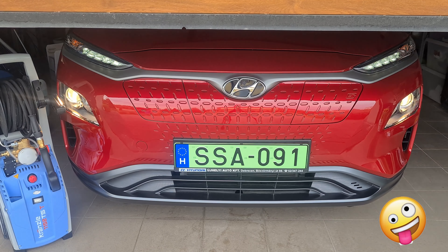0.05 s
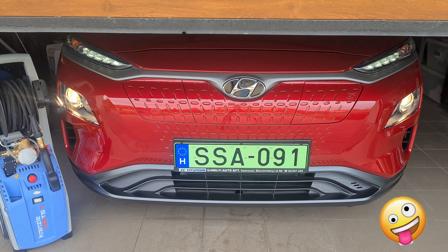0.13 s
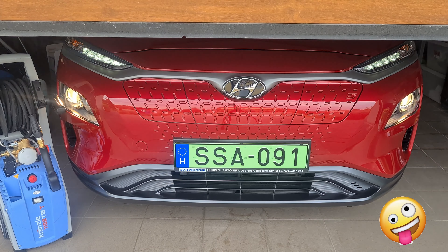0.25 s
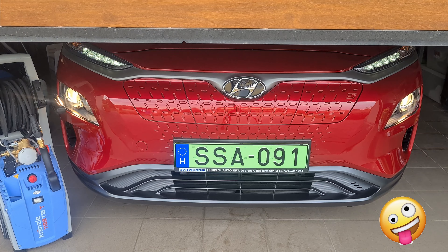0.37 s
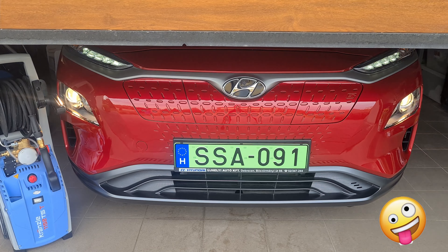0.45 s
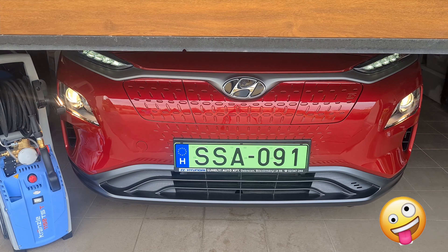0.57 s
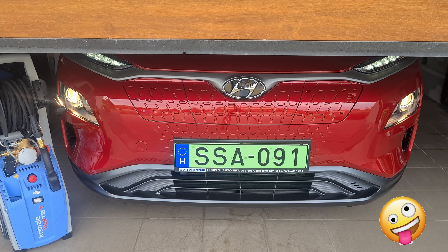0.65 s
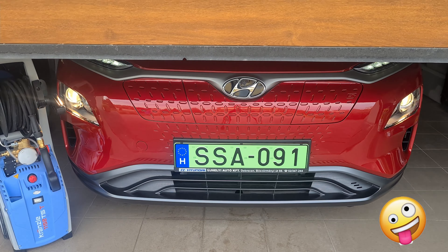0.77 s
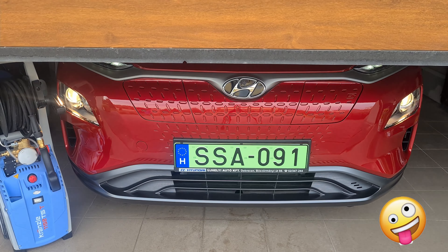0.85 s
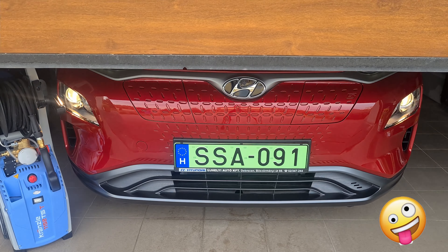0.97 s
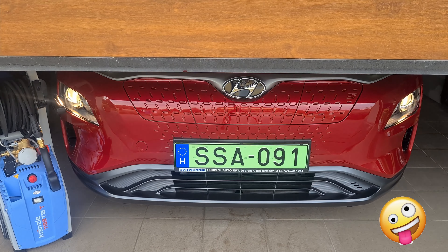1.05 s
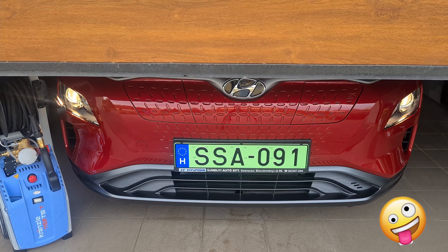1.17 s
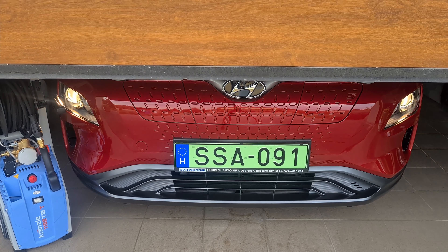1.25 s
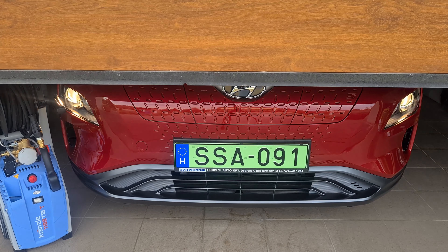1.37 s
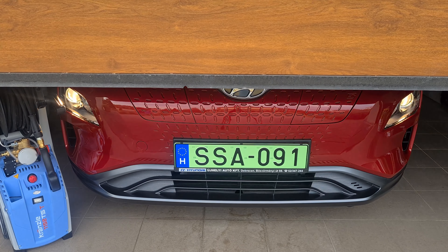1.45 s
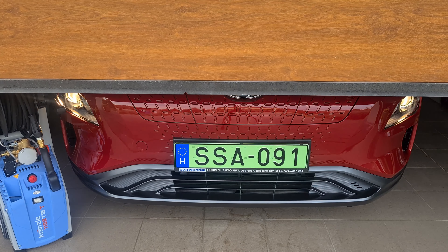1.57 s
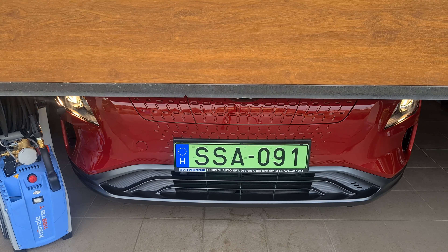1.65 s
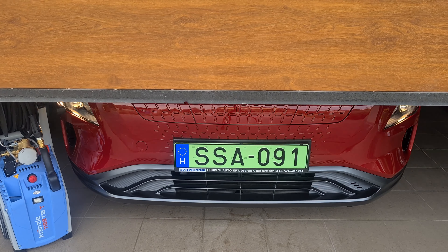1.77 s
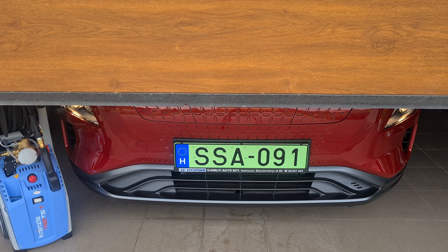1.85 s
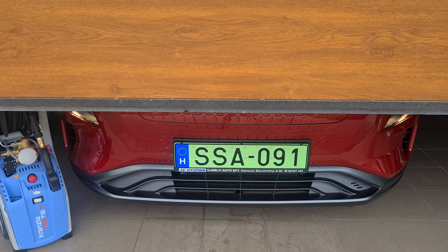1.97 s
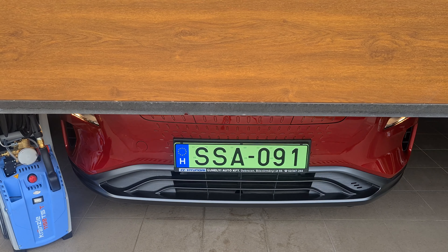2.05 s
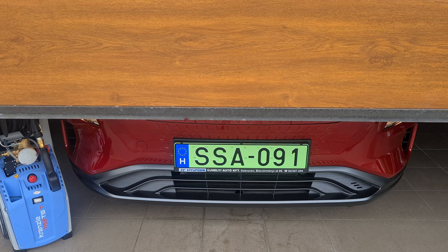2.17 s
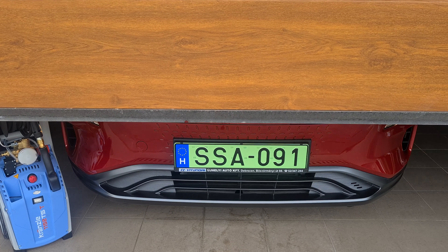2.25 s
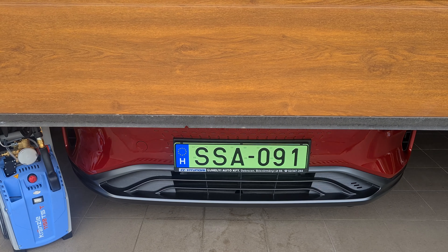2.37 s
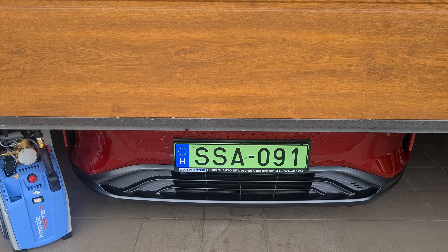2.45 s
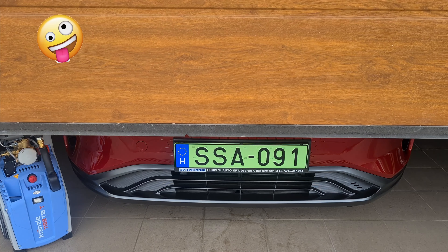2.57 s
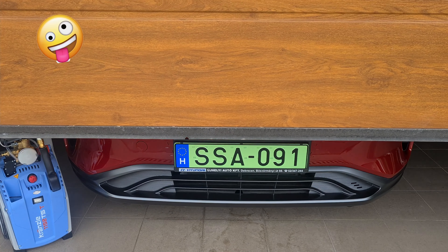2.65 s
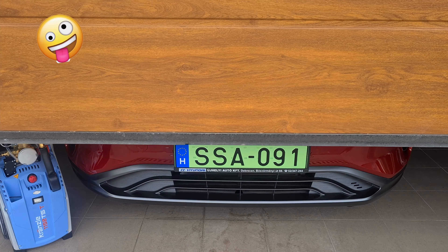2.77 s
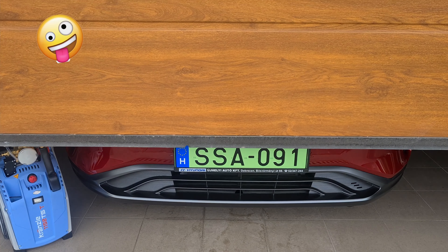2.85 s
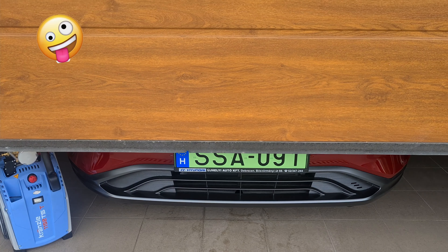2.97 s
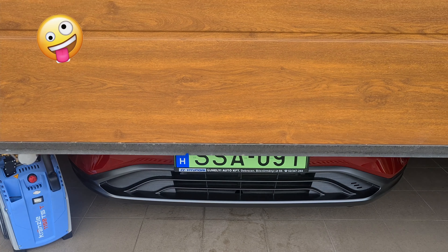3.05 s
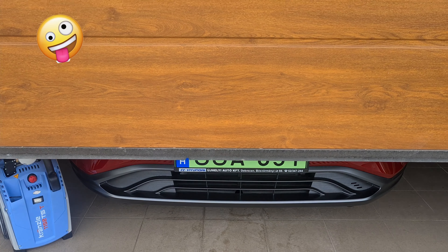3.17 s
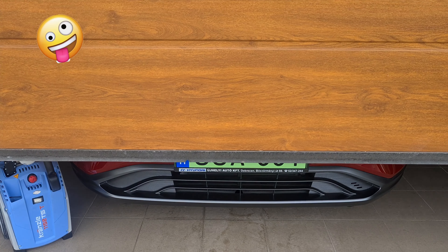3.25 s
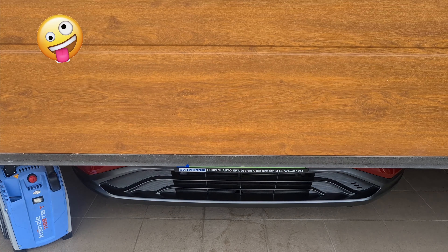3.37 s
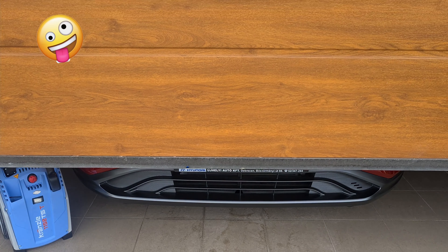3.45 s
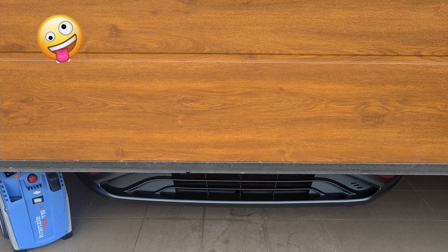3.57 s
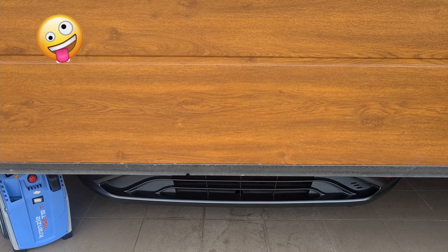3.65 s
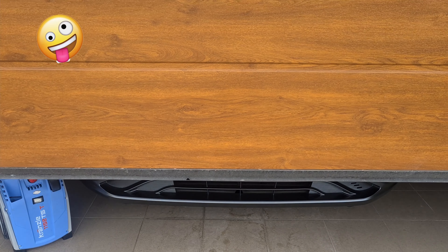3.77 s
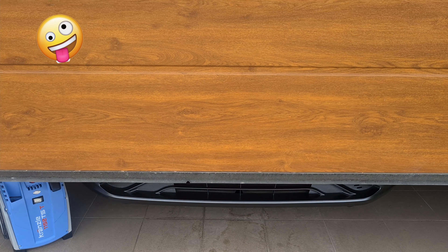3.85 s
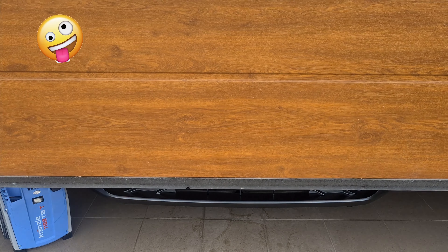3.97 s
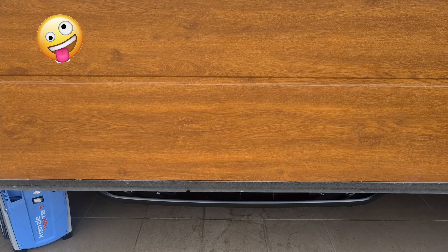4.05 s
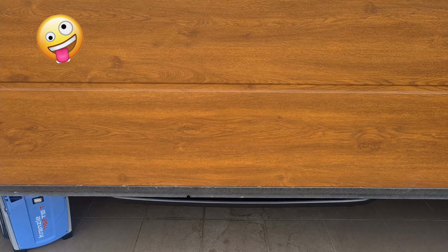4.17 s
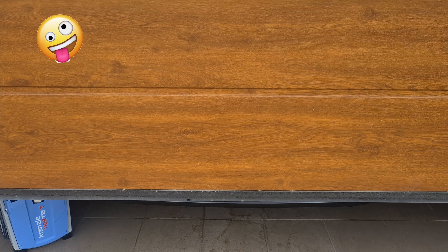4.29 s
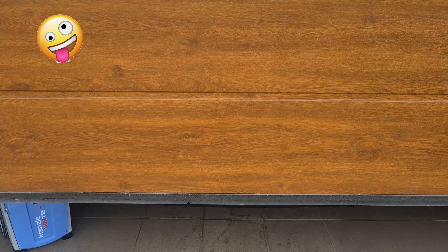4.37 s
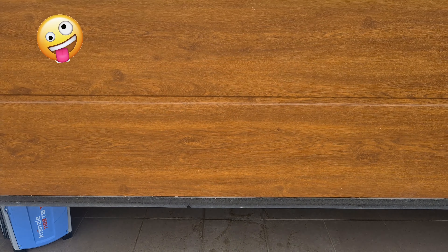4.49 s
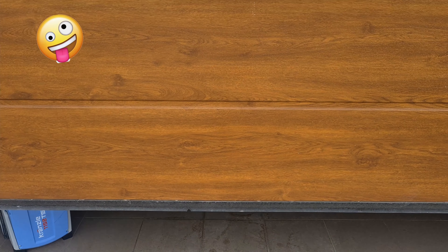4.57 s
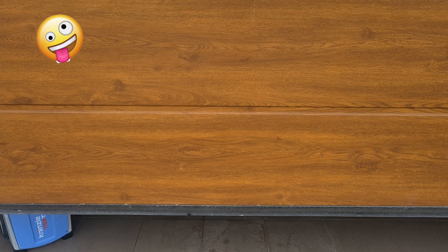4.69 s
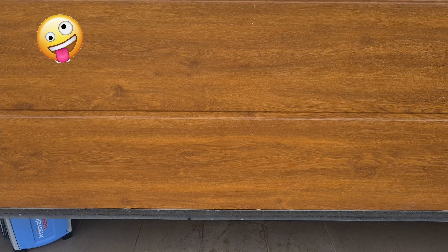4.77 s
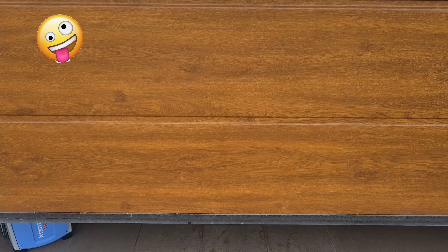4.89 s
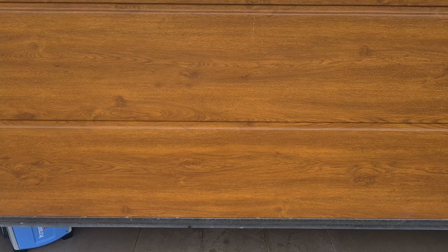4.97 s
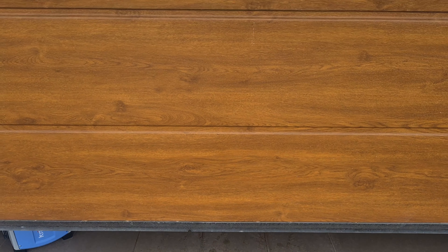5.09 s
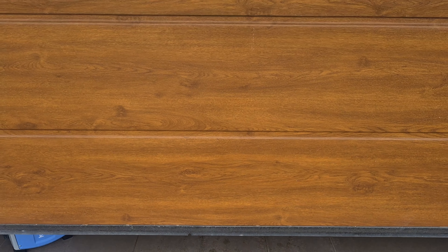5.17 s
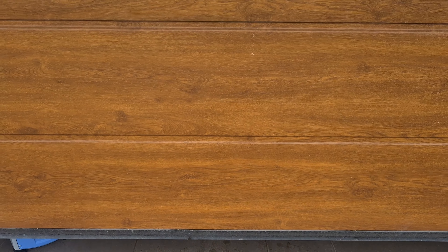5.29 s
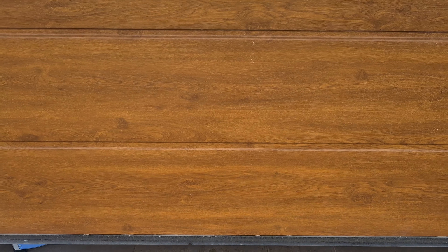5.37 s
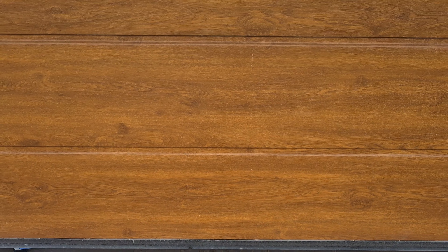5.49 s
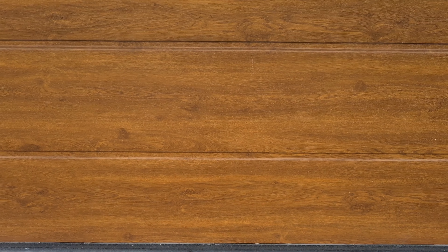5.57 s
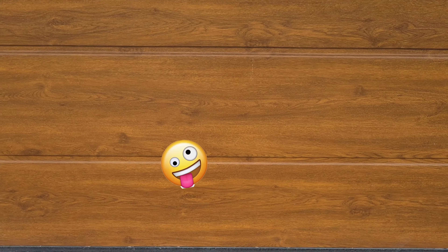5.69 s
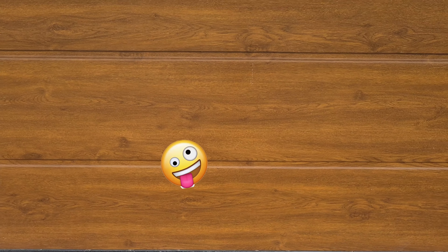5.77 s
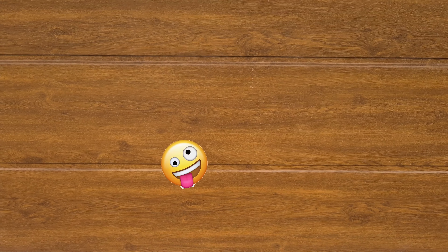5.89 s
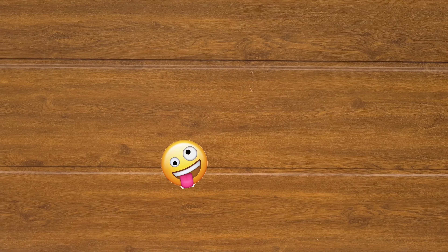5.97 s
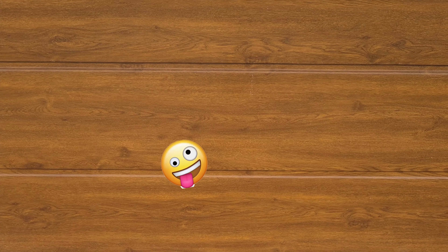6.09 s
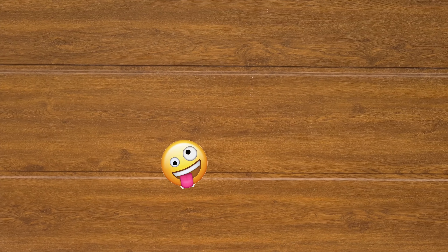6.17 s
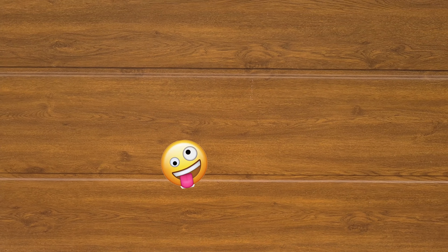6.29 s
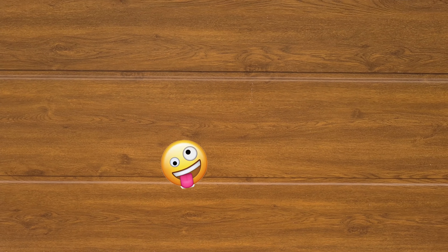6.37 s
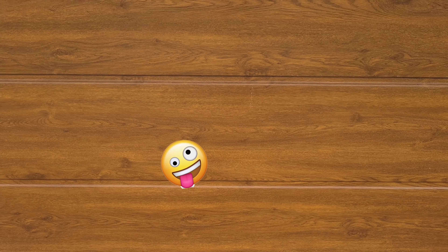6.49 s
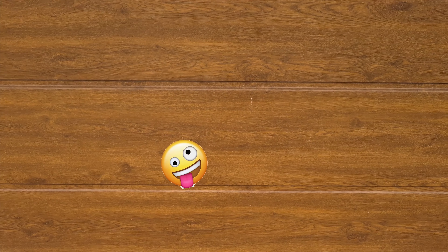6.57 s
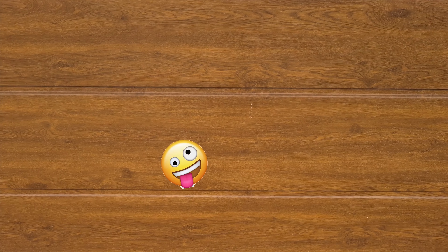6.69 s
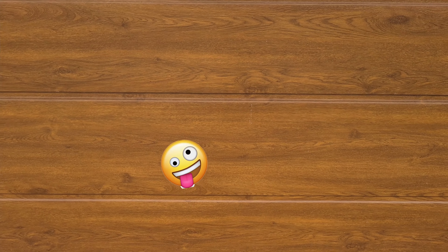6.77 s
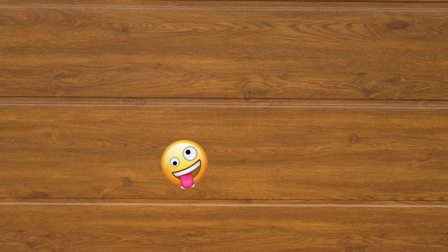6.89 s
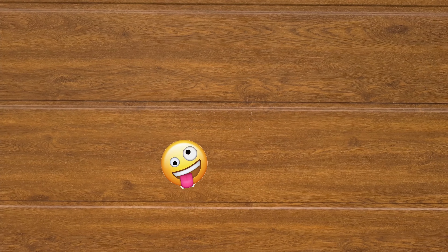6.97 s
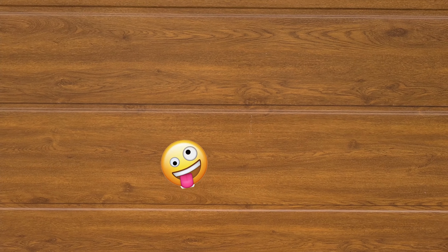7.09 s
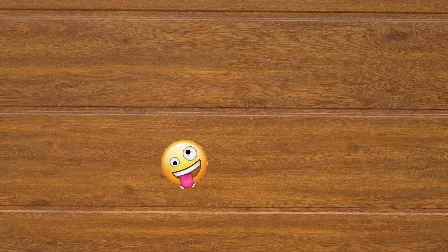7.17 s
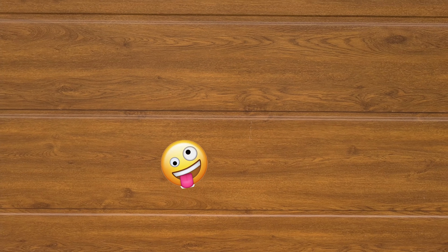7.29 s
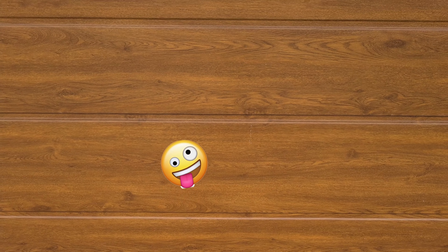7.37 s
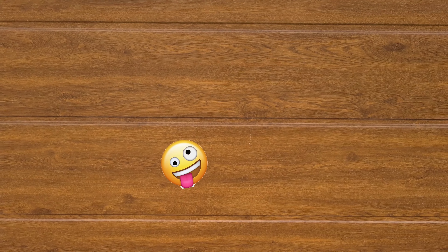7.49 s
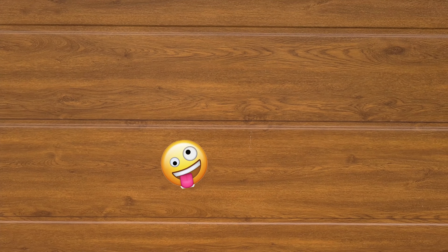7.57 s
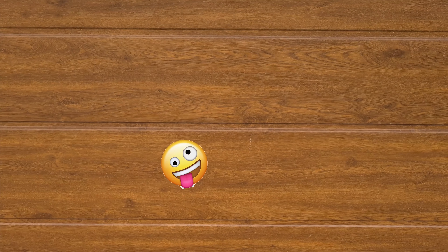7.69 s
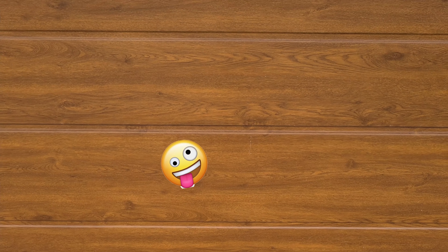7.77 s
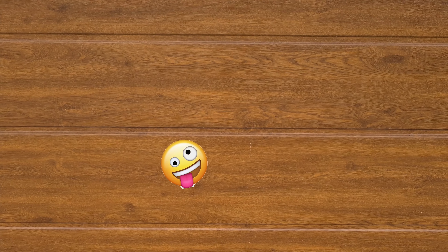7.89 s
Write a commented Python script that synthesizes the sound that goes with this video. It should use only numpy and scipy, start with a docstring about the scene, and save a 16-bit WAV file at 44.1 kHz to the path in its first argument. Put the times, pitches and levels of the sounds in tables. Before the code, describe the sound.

Constant low droning hum of a garage door opener, fluttering about eleven times a second, with soft rumble, tiny metallic tinks, and accelerating fade.

```python
"""An electric opener lowers a sectional garage door, heard from just outside.
It is already running: an eight-tooth wheel, meshing about 86 teeth a second, makes rail and panels hum and
flutter once a turn; teeth rattle and scrape, rollers rumble, loose fittings ring. The motor slows slightly
over the first two seconds, then picks up again; six sharper tinks fall in the first three seconds.
All but the tinks fade, ever faster, to the end."""
import sys
import numpy as np
from scipy import signal
from scipy.fft import rfft, irfft, next_fast_len
from scipy.io import wavfile
from scipy.ndimage import map_coordinates

SR = 44100
rng = np.random.default_rng(int(sys.argv[2]) if len(sys.argv) > 2 else 0)


def transcribe(signal):
    """Save signal, clipped to [-1, 1], as a 16-bit WAV file at the path in sys.argv[1]."""
    frames = np.atleast_2d(signal).T
    limited = np.clip(frames, -1, 1)
    pcm = np.round(limited * 32767).astype(np.int16)
    wavfile.write(sys.argv[1], SR, pcm)


N = 350154

# All table levels are relative within their layer; the mix sets the layer.
# motor pace, dipping and then recovering: [t/s, meshing rate/(teeth per s)]
MOTOR_PACE = [(0.0, 86.953), (0.992, 85.609), (2.233, 85.429), (2.729, 86.136), (3.97, 86.526),
              (4.714, 86.195), (5.459, 86.273), (6.203, 86.757), (7.94, 86.485)]
# unevenly worn teeth, one row each; negative lateness is early:
# [push on door level/dB, push late t/s, knock on rail level/dB, knock late t/s, rattle level/dB]
WORN_TEETH = [(5, -.0031, -2, .0013, -5), (3, .0029, 0, .0011, 7), (0, .0001, 3, .0009, 1),
              (6, .0008, 4, .0015, -1), (-7, -.0022, 4, .0007, -3), (-10, -.0008, 2, .0012, -1),
              (1, .0014, -9, -.0011, 0), (0, .0007, 5, .0009, 0)]
# clear notes of the hum: [multiple of the wheel's turning rate, level/dB]
HUM_NOTES = [(6, -17.4), (8, 0.0), (13, -23.5), (16, -11.0), (17, -20.3), (19, -15.6), (22, -14.5),
             (24, -10.1), (25, -14.2), (27, -20.8), (28, -24.5), (29, -25.3), (30, -17.2), (40, -17.3),
             (48, -14.9)]
# buzzing lines on the other multiples, coloured by panels and rail: [f/Hz, level per line/dB]
BUZZ_COLOUR = [(60, -36.5), (340, -30.5), (380, -39.5), (470, -32), (525, -19.5), (565, -31.5),
               (590, -20.5), (620, -27), (655, -25), (720, -43)]
# ring of loose steel fittings: [f/Hz, single-pass width/Hz, level/dB]
FITTING_MODES = [(1800, 85, 0), (1985, 100, -9), (2245, 120, -15), (2730, 55, -20), (2950, 130, -25),
                 (4940, 70, -22)]
# resonances of the opener's housing: [f/Hz, single-pass width/Hz, level/dB]
HOUSING_MODES = [(757, 32, 0), (822, 22, -10), (915, 58, -3), (1018, 38, -7), (1108, 36, -7),
                 (1250, 120, -19), (1370, 100, -21)]
# the sharpest tinks: [t/s, peak level before the mix/dB]
SHARP_TINKS = [(0.5614, -41.5), (0.841, -37), (1.8677, -40), (2.4301, -36), (2.8044, -38), (2.9875, -43)]
# rollers rumbling in the panels: [f/Hz, level per Hz/dB]
ROLLER_SPECTRUM = [(15, -32), (33, -30.5), (52, -11), (75, 0), (105, -10), (190, -11.5), (280, -10),
                   (335, -12), (380, -18.5), (480, -11), (560, -12.5), (660, -9), (830, -27), (1400, -35.5),
                   (2500, -73.5), (6000, -120)]
# teeth scraping: [f/Hz, level per Hz/dB]
SCRAPE_SPECTRUM = [(500, -10), (1200, 4), (2200, 3), (3300, -2), (4100, -3), (5000, 1), (5800, 0),
                   (7000, -4), (8100, -11), (8800, -10), (10400, -22), (12000, -28), (15500, -37)]

# fade: level at first, loss a second, growth of that loss
OPEN_DB, FADE_DB_PER_S, STEEPEN_DB_PER_S2 = -12.5, 1.33, 0.1158
TOP_HZ = 15700  # the recorder's band limit


def amp(db):
    """Decibels to gain."""
    return 10 ** (np.asarray(db) / 20)


def unit(x):
    """x at rms 1."""
    return x / np.sqrt(np.mean(x ** 2) + 1e-20)


def curve(rows):
    """(t/s, value) rows as one value per sample."""
    return np.interp(np.arange(N) / SR, *np.transpose(rows))


def wobble(rate):
    """A smooth random curve, rate knots a second."""
    knots = rng.standard_normal(int(N * rate / SR) + 4)
    return map_coordinates(knots, [np.arange(N) * rate / SR])


def filtered(x, response):
    """x times a complex response of frequency, padded so that its ring can die away."""
    size = next_fast_len(N + SR // 2)
    spectrum = rfft(x, size) * response(np.fft.rfftfreq(size, 1 / SR))
    return irfft(spectrum, size)[:N]


def colour(x, spectrum):
    """x at rms 1, shaped by (f/Hz, level/dB) points joined along a log frequency axis."""
    hz, db = np.transpose(spectrum)
    return unit(filtered(x, lambda f: amp(np.interp(np.log(f + 1), np.log(hz), db))))


def ring(x, modes):
    """x through resonances, each passed twice: they swell briefly and have steep skirts."""
    def response(f):
        total = 0
        for centre, width, db in modes:
            one_pass = 1j * f * width / (centre ** 2 - f ** 2 + 1j * f * width)
            total = total + amp(db) * one_pass ** 2
        return total
    return filtered(x, response)


def blows(times, sizes):
    """Single-sample pushes at the given times in seconds."""
    at = np.round(times * SR).astype(int)
    inside = (at >= 0) & (at < N)
    return np.bincount(at[inside], sizes[inside], N)


def fade():
    """Gain that falls ever faster, alike at all frequencies."""
    t = np.arange(N) / SR
    return amp(OPEN_DB - FADE_DB_PER_S * t - STEEPEN_DB_PER_S2 * t ** 2 / 2)


def walls(x, echo_db, count=40):
    """A garage-length of quick echoes gives the hiss a faintly rippled colour."""
    longest_s = .03
    delays = (rng.random(count) * longest_s * SR).astype(int)
    echo_pattern = np.bincount(delays, rng.standard_normal(count))
    echoes = signal.fftconvolve(x, echo_pattern)[:N]
    return unit(x + amp(echo_db) * unit(echoes))


def rumble(unsteady_db, knots_per_s):
    """Rollers rumble in the panels: low coloured noise whose level wanders."""
    return colour(rng.standard_normal(N), ROLLER_SPECTRUM) * amp(unsteady_db * wobble(knots_per_s))


def chatter(per_second, scatter_db):
    """The shaking keeps the loose fittings lightly ringing, as small blows at random times."""
    count = int(per_second * N / SR)
    times = rng.uniform(0, N / SR, count)
    sizes = amp(scatter_db * rng.standard_normal(count))
    return unit(ring(blows(times, sizes), FITTING_MODES))


def tinks():
    """Now and then a fitting strikes harder: the same ring, each scaled to its own peak level."""
    times, peak_db = np.transpose(SHARP_TINKS)
    lone_tink = ring(blows(np.array([1.]), np.ones(1)), FITTING_MODES)
    return ring(blows(times, amp(peak_db)), FITTING_MODES) / np.abs(lone_tink).max()


def wheel(sway_teeth, knots_per_s):
    """Teeth passed so far: the wheel follows the motor, swaying slightly under the door's weight."""
    start = .406  # in teeth
    return start + np.cumsum(curve(MOTOR_PACE)) / SR + sway_teeth * wobble(knots_per_s)


def scrape(mesh, lead_teeth, fall_db, grit_db, uneven):
    """Friction hiss jumps up as each tooth engages and dies down as it slides home."""
    tooth, slide = np.divmod(mesh + lead_teeth, 1)
    rattle_db = np.array(WORN_TEETH)[tooth.astype(int) % len(WORN_TEETH), -1]
    friction = amp(uneven * rattle_db - fall_db * slide + grit_db * wobble(300))
    return colour(friction * rng.standard_normal(N), SCRAPE_SPECTRUM)


def rattle(mesh, modes, jitter_s, scatter_db, lead_s):
    """Each tooth strikes a set of resonances, never quite the same way twice."""
    tooth = np.arange(1, int(mesh[-1]))
    *_, late, rattle_db = np.array(WORN_TEETH)[tooth % len(WORN_TEETH)].T
    chance = rng.standard_normal((len(tooth), 2))
    meshing_s = np.interp(tooth, mesh, np.arange(N) / SR)
    times = meshing_s + late - lead_s + jitter_s * chance[:, 0]
    sizes = amp(rattle_db + scatter_db * chance[:, 1])
    return unit(ring(blows(times, sizes), modes))


def hum(mesh, waver, bass_loss_db):
    """Rail and panels sound lines at multiples of the turning rate, timed by the blows of the teeth."""
    push_db, push_late, knock_db, knock_late, _ = np.transpose(WORN_TEETH)
    teeth = len(WORN_TEETH)
    turn = 2 * np.pi * mesh / teeth
    speed = np.mean(curve(MOTOR_PACE))
    highest_panel_order = 36
    # the deepest notes lose a little more level than the rest
    bass = amp(bass_loss_db * np.linspace(.5, -.5, N))

    orders = np.arange(6, 67)
    buzz_db = np.interp(orders * speed / teeth, *np.transpose(BUZZ_COLOUR))
    lines = dict(zip(orders, buzz_db))
    lines.update(dict(HUM_NOTES))  # clear notes replace the buzz on their multiples
    out = np.zeros(N)
    for order, db in lines.items():
        # the heavy panels follow each tooth's push, the light rail its knock
        if order <= highest_panel_order:
            blow_db, late = push_db, push_late
        else:
            blow_db, late = knock_db, knock_late
        place = (np.arange(teeth) + late * speed) / teeth  # in turns
        timing = np.angle(np.sum(amp(blow_db) * np.exp(-2j * np.pi * order * place)))
        line = amp(db) * np.cos(order * turn + timing)
        out += line * (bass if order <= teeth else 1)
    return unit(out) * (1 + waver * wobble(12))


def scene():
    """One wheel times hum, rattles and scrape; all but the tinks fade together."""
    mesh = wheel(sway_teeth=.01, knots_per_s=4)
    door = amp(-15.0) * rumble(unsteady_db=0.74, knots_per_s=8.9)
    door += amp(-41.0) * chatter(per_second=160, scatter_db=1.5)

    hiss = scrape(mesh, lead_teeth=0.063, fall_db=5.0, grit_db=1.5, uneven=0.21)
    drive = amp(-43.5) * walls(hiss, echo_db=-13)
    drive += amp(-44) * rattle(mesh, FITTING_MODES, jitter_s=.0003, scatter_db=4.0, lead_s=.001)
    drive += amp(-29.0) * rattle(mesh, HOUSING_MODES, jitter_s=.00008, scatter_db=2.5, lead_s=.006)
    drive += amp(-0.64) * hum(mesh, waver=0.0078, bass_loss_db=2.0)
    return (fade() * (drive + door) + amp(0.5) * tinks())[None]


def record(dry):
    """The recorder keeps nothing above its band limit."""
    return filtered(dry[0], lambda hz: hz < TOP_HZ)[None]


dry = scene()
out = record(dry)
transcribe(out)
```